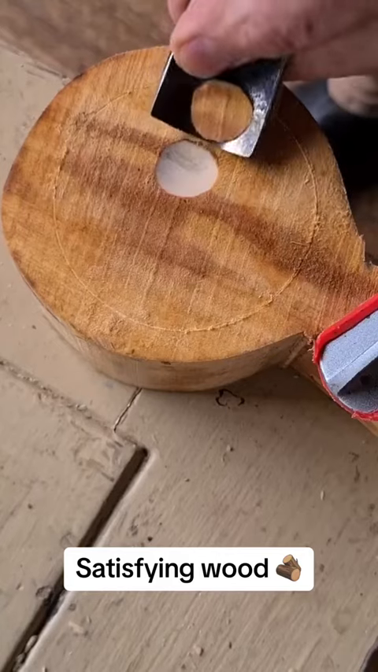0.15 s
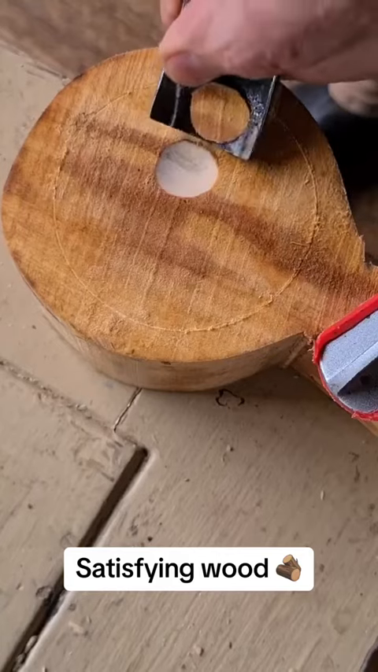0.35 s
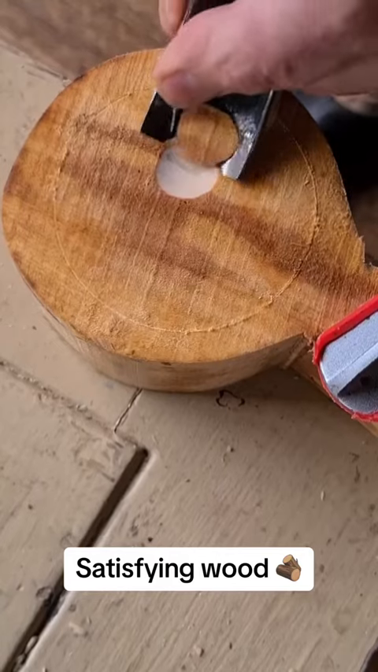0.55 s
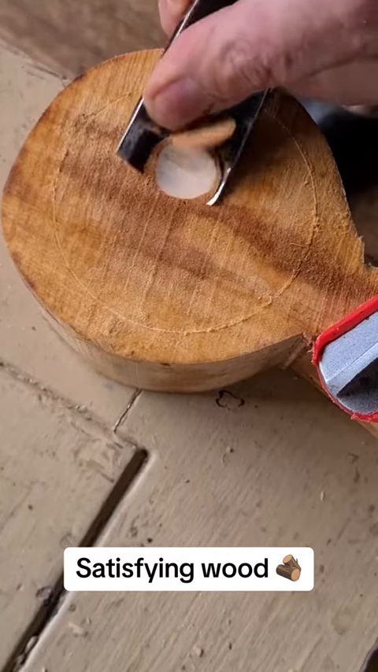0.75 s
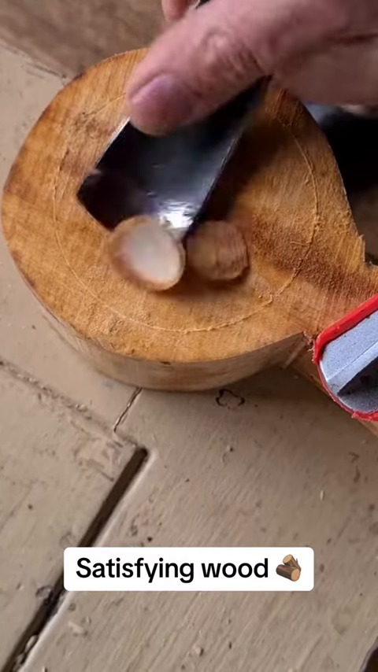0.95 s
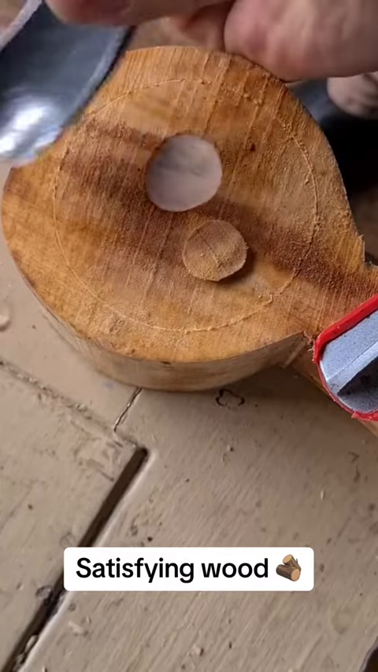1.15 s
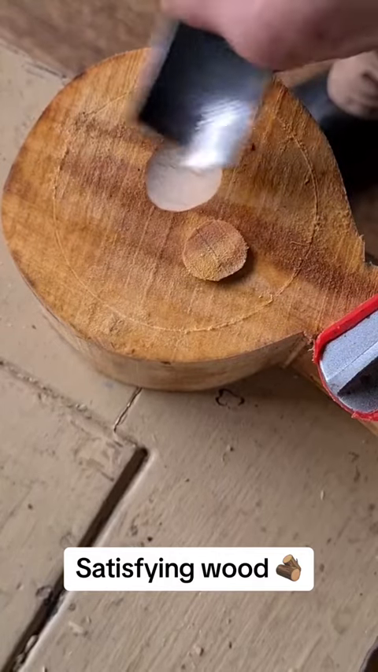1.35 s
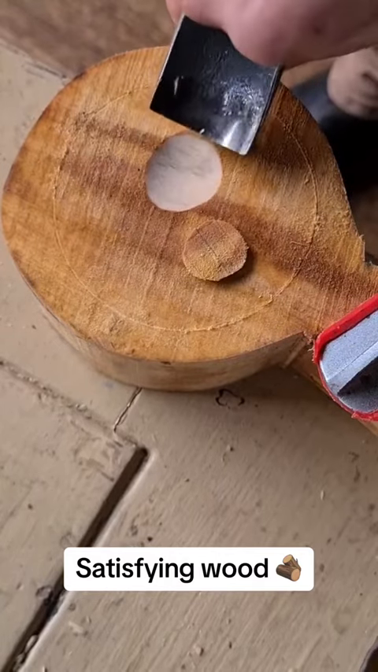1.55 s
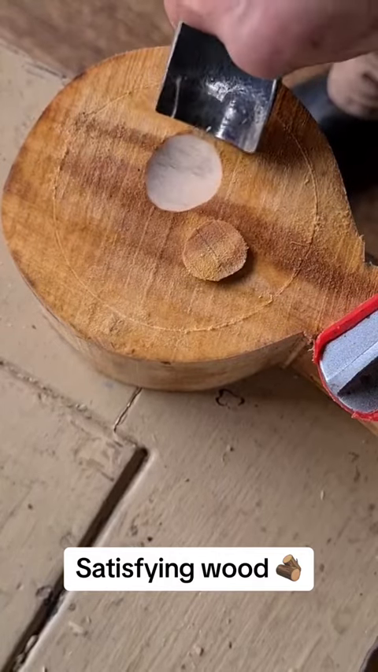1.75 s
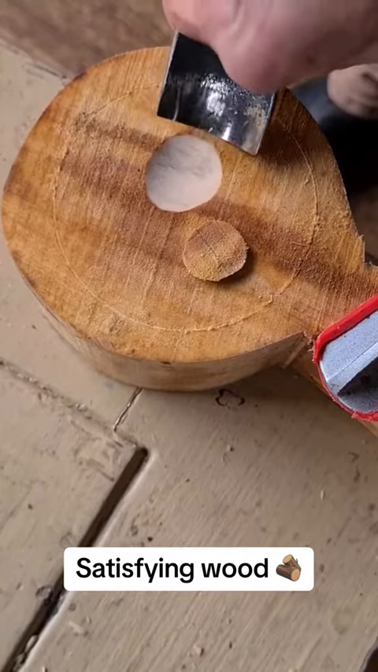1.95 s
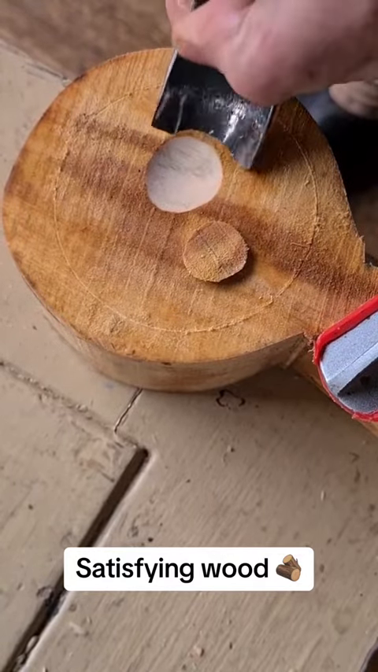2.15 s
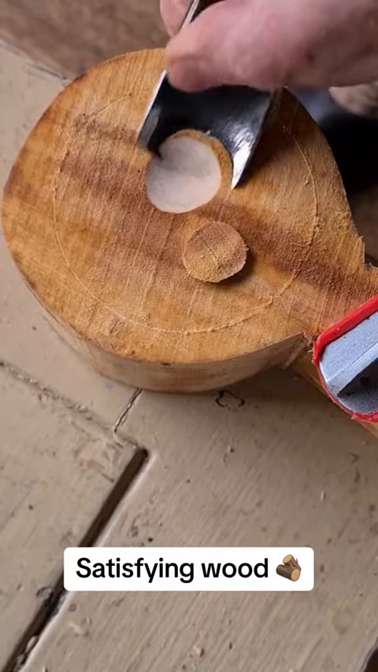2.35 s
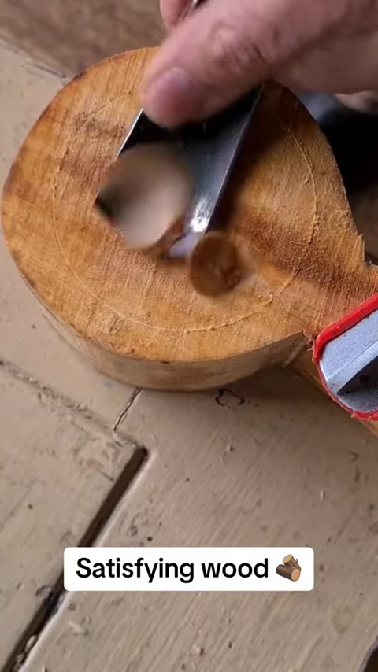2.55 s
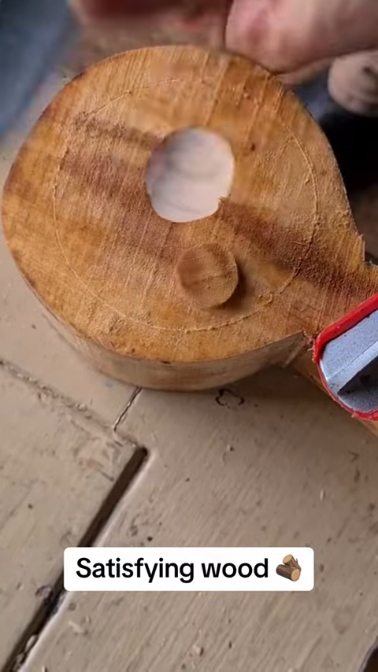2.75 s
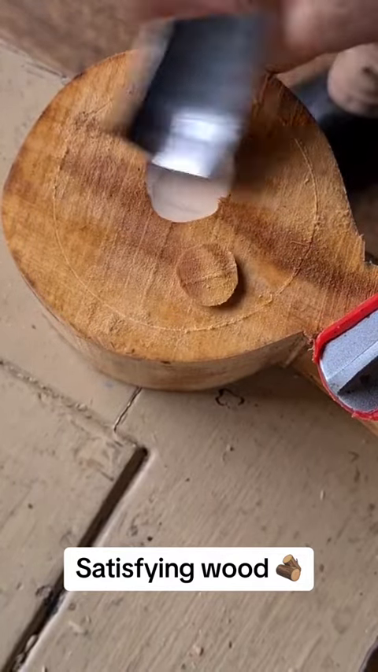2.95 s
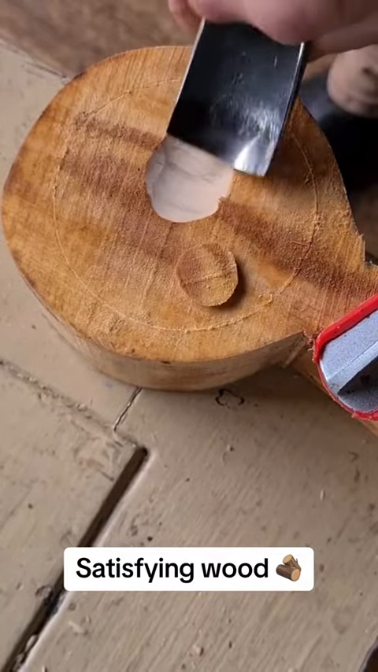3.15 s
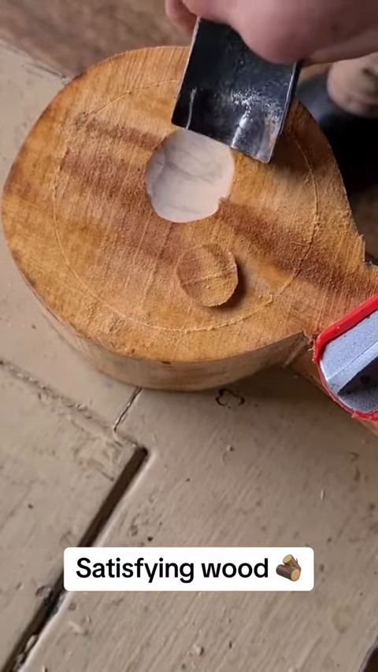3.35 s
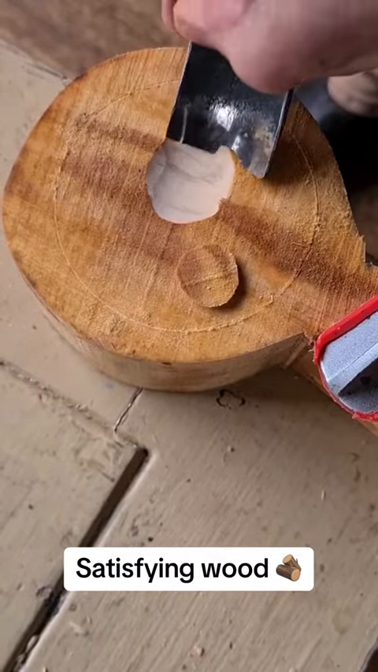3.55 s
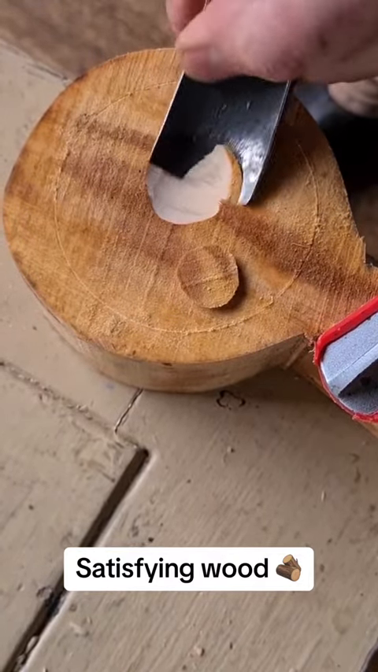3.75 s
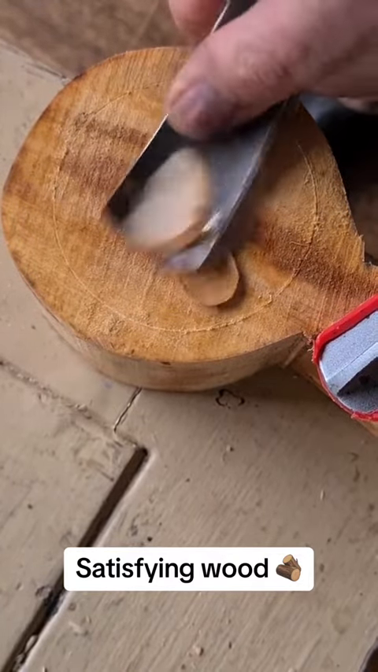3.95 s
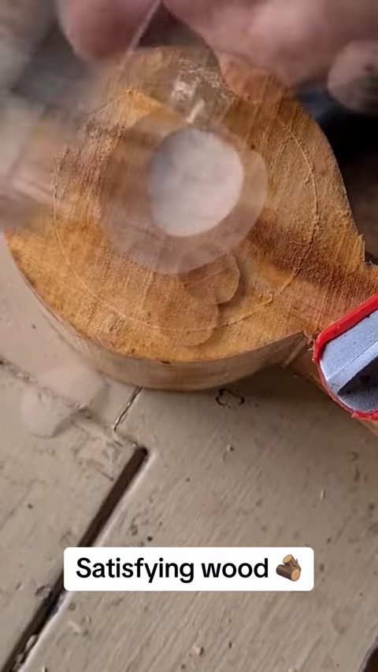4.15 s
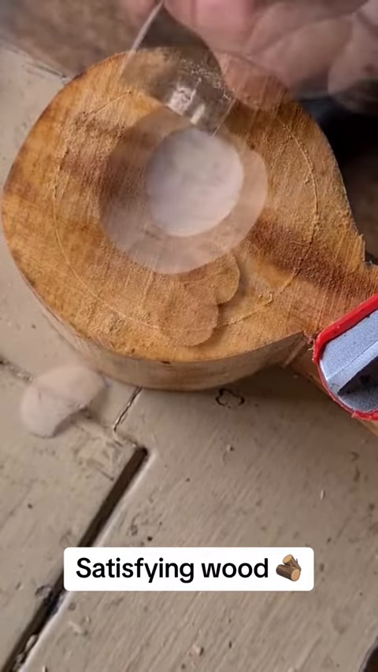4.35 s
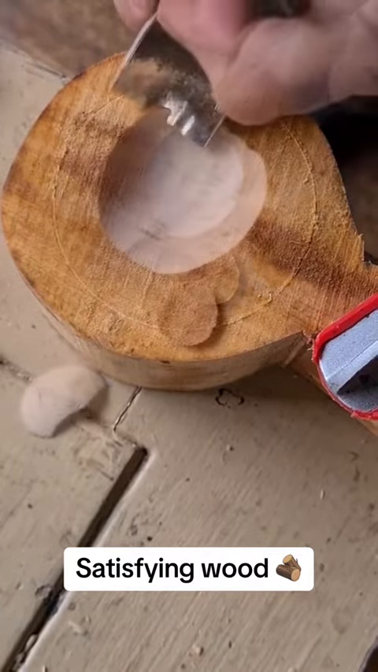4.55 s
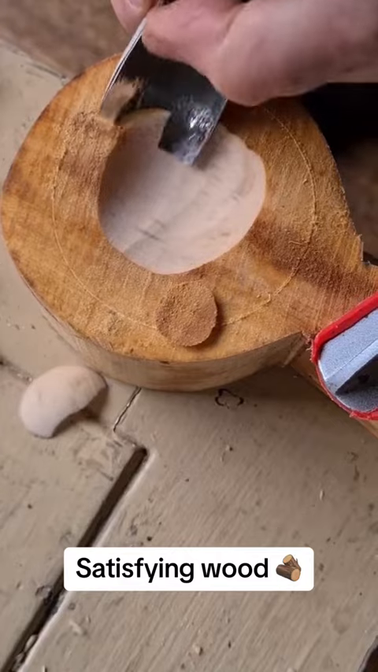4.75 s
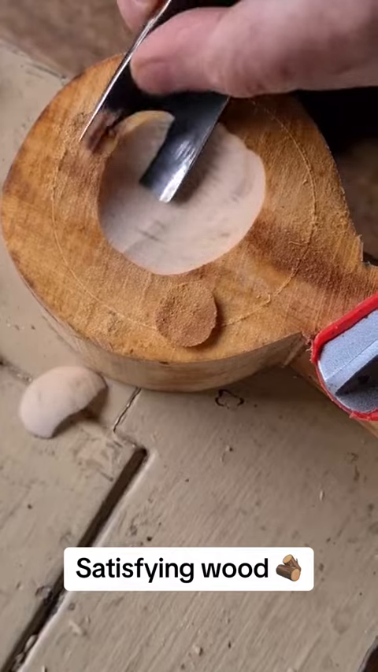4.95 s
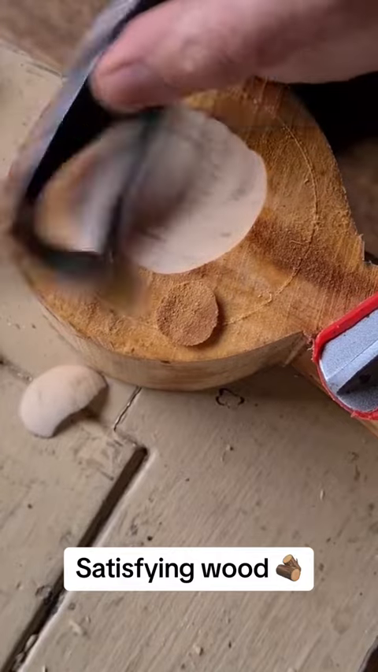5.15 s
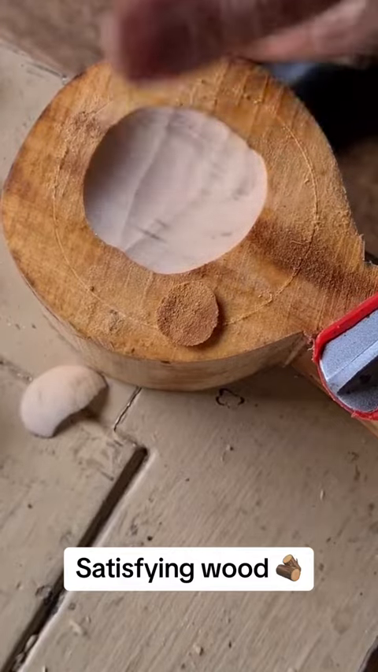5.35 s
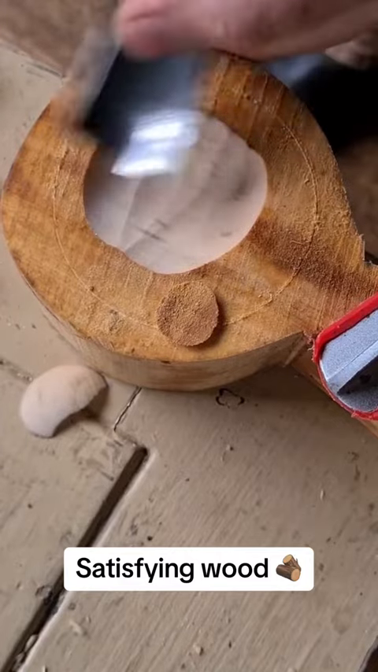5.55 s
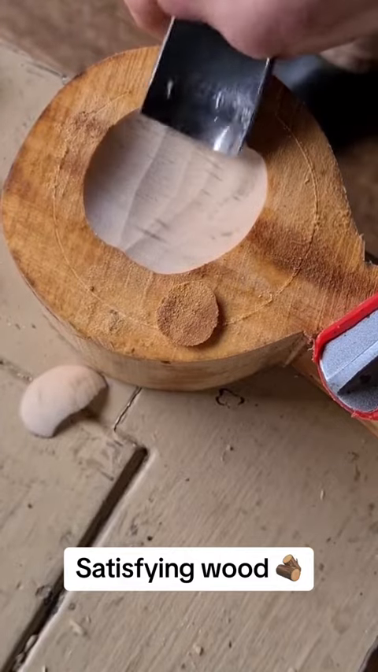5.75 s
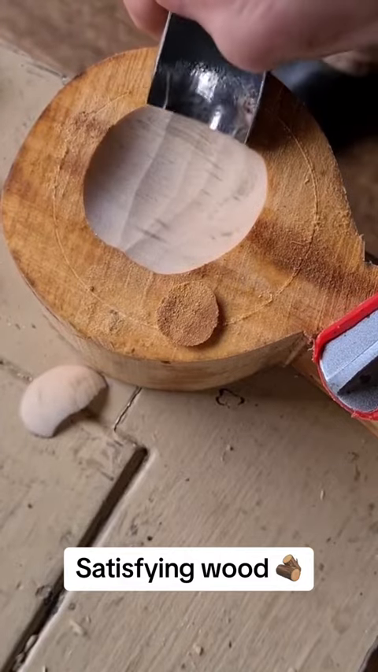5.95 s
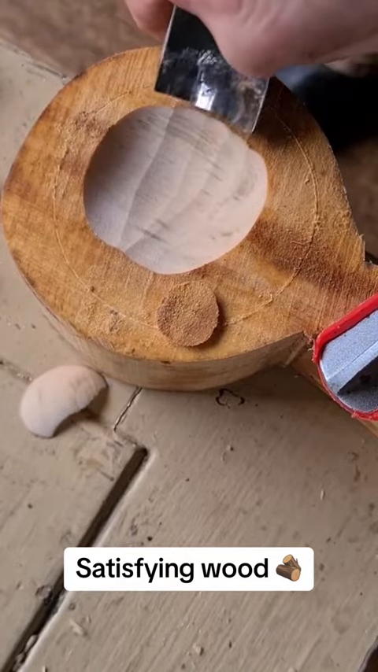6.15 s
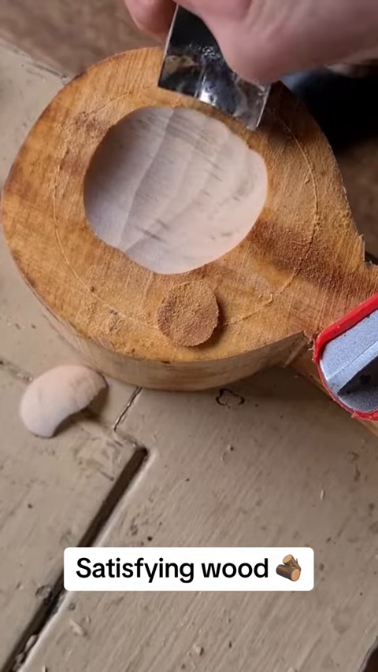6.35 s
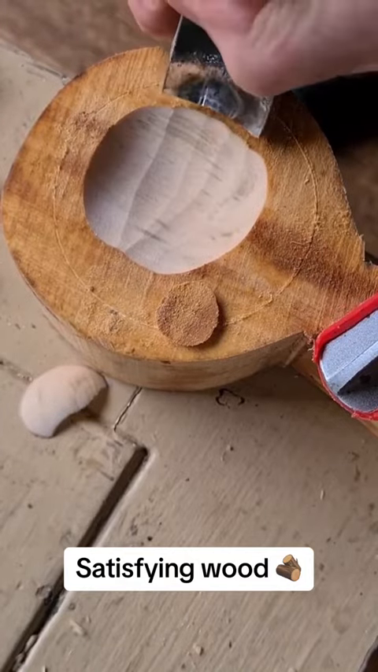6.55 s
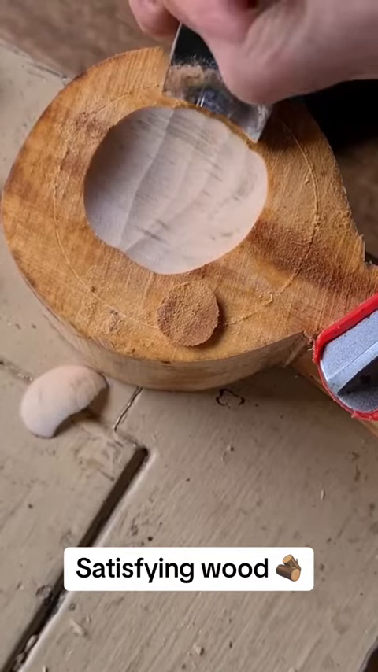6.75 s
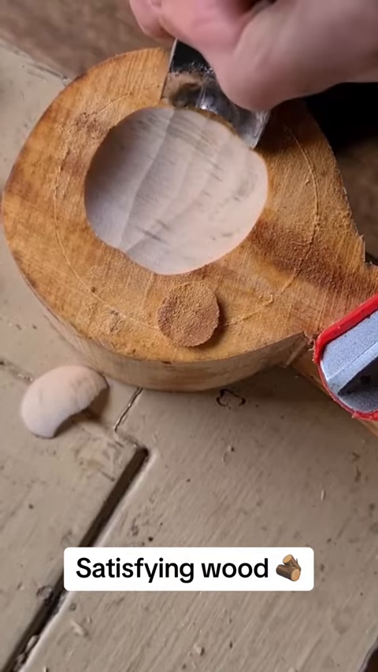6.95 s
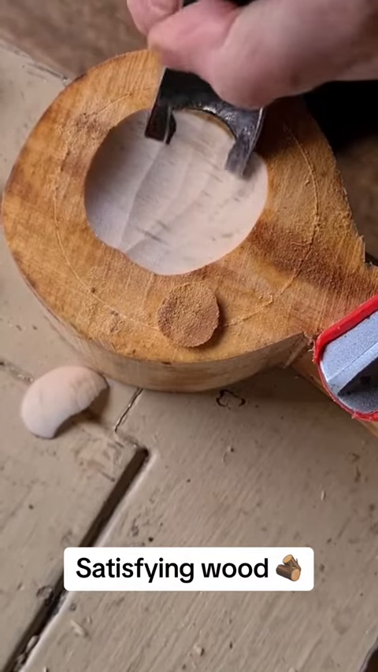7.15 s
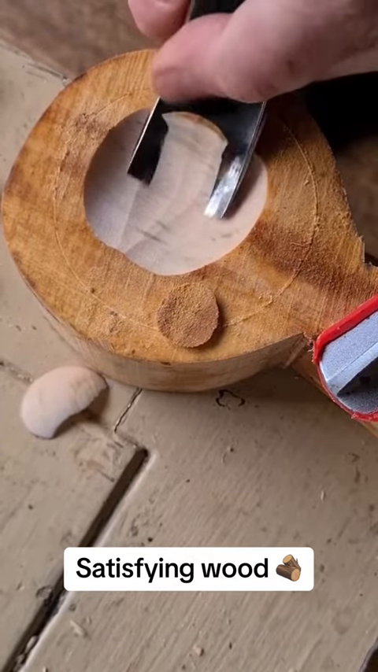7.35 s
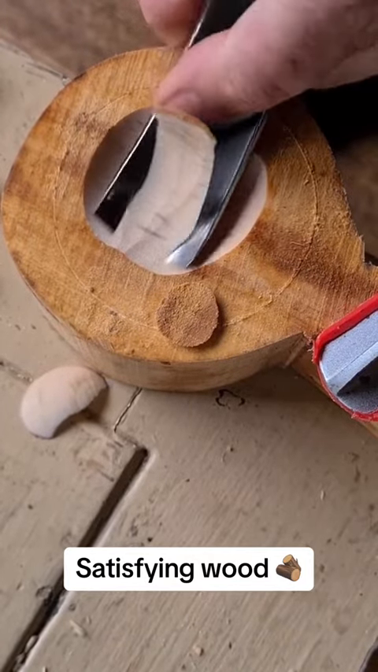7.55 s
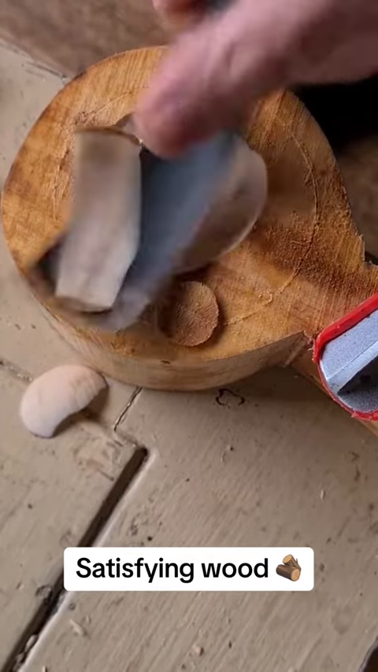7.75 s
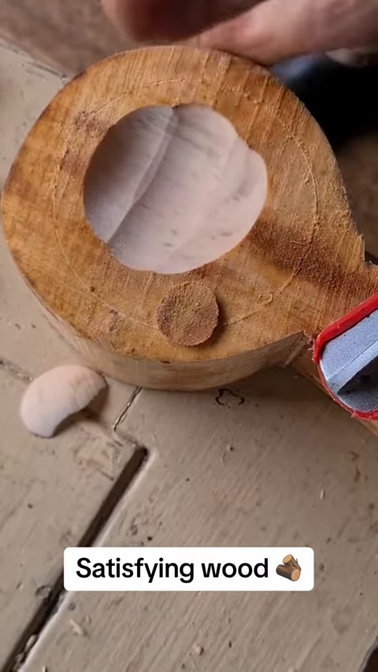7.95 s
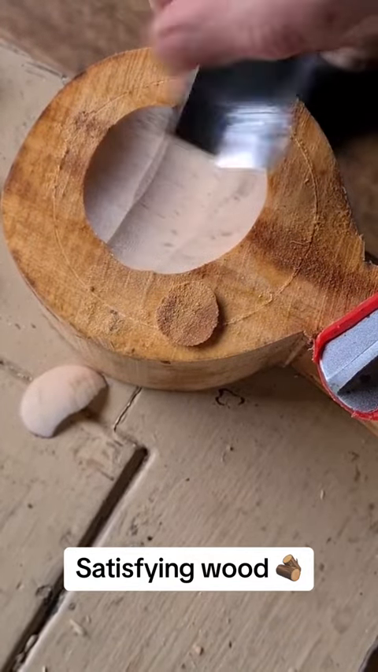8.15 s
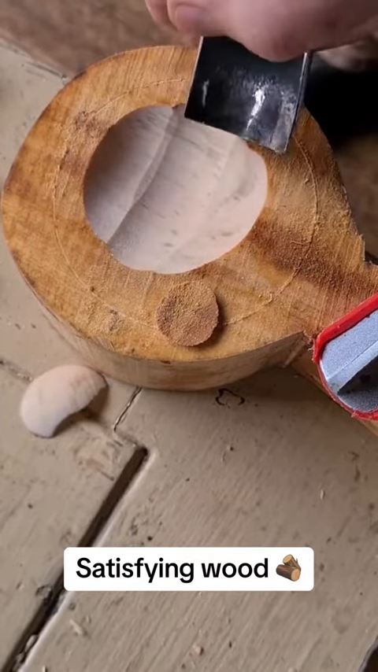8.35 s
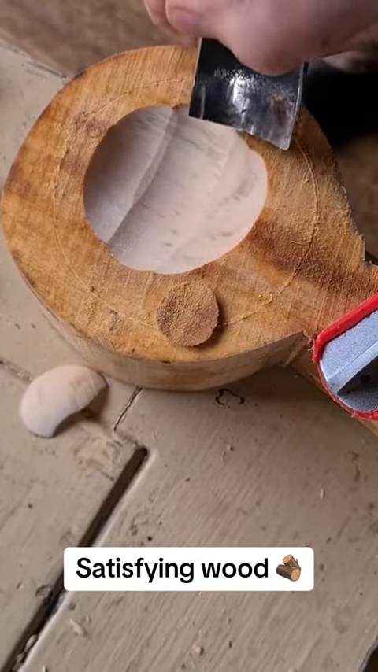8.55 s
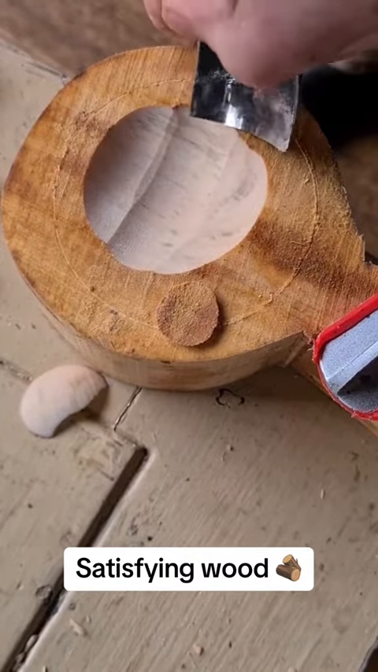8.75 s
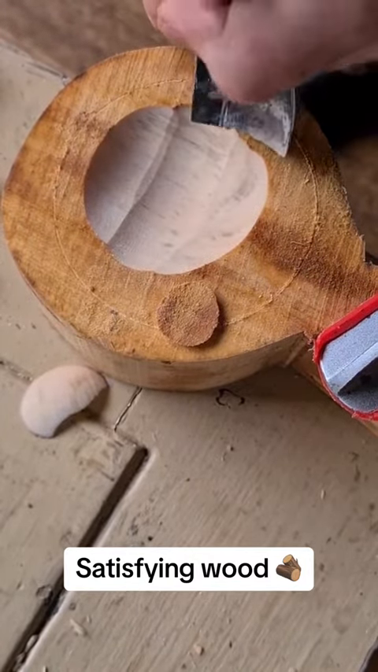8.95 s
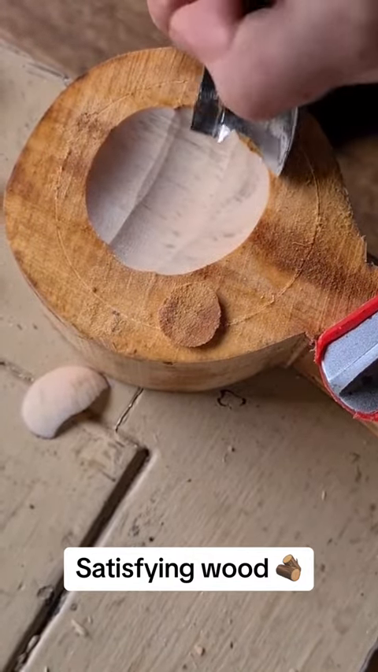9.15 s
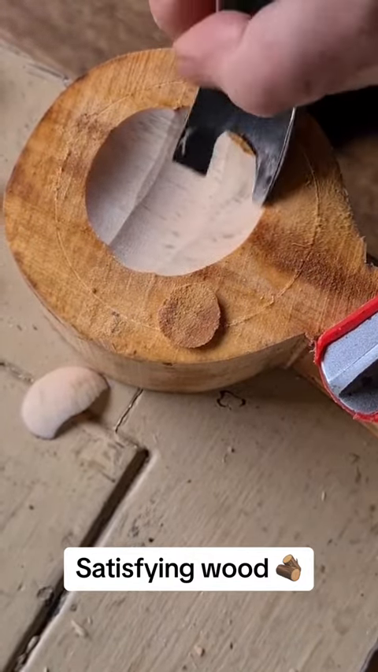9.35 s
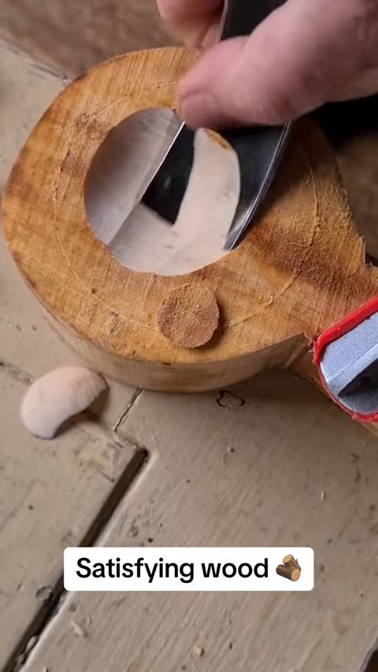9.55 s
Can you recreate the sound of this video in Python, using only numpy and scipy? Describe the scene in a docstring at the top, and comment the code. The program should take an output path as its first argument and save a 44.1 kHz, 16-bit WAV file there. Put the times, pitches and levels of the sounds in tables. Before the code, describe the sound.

A hand gouge scrapes and crunches through wood in separate strokes, with small steel ticks and dull wooden knocks, close by.

```python
"""A hand gouge cuts six strokes across the end grain of a small log slice lying on a wooden board.
Fibres fracture by the thousand under the edge and excite the resonances of the wood; as the shaving
lengthens, its friction on the steel rises to a hiss. Hand and shaving rub and creak, steel and chips
tick, the block knocks on the board, and once the blade springs free and rings.
The sound is heard from close by in a small room."""
import sys
import numpy as np
from scipy import signal
from scipy.fft import rfft, irfft, next_fast_len
from scipy.io import wavfile

SR = 44100
rng = np.random.default_rng(int(sys.argv[2]) if len(sys.argv) > 2 else 0)


def transcribe(signal):
    """Save signal, clipped to [-1, 1], as a 16-bit WAV file at the path in sys.argv[1]."""
    frames = np.atleast_2d(signal).T
    limited = np.clip(frames, -1, 1)
    pcm = np.round(limited * 32767).astype(np.int16)
    wavfile.write(sys.argv[1], SR, pcm)


N = 423801
TIME = np.arange(N) / SR
BINS = np.fft.rfftfreq(8192, 1 / SR)

# Spectrum of the room noise: f/Hz, relative level/dB
AIR_SPECTRUM = [(15, -30.5), (25, -8), (53, -8), (320, -8), (540, -15), (1410, -14), (2170, -18.5),
                (7000, -26.5), (9000, -40)]
# Swells of friction: centre t/s, duration/s, level/dB, resonance f/Hz, half-width/Hz
RUBS = [(0.108, 0.17, -62, 397, 110), (0.242, 0.47, -69, 1170, 2500), (0.717, 0.3, -46.5, 3630, 450),
        (0.719, 0.075, -38, 444, 100), (0.922, 0.17, -46.5, 10900, 3500), (2.345, 0.34, -59.5, 4230, 700),
        (4.028, 0.043, -32.5, 400, 140), (5.057, 0.49, -46.5, 3350, 260), (5.129, 0.23, -34.5, 1140, 170),
        (5.169, 0.17, -41, 6090, 259), (5.298, 0.032, -47, 750, 300), (6.18, 0.25, -63.5, 340, 200),
        (7.614, 0.33, -35, 5380, 650), (8.062, .11, -56.5, 340, 400), (8.678, 0.15, -57.5, 400, 70),
        (9.52, 0.14, -39, 1170, 130)]
# Peaks and dips of the hollow in the wood: f/Hz, half-width/Hz, height/dB
HOLLOW_PEAKS = [(1165, 130, 2.5), (1627, 30, -6.5), (1920, 84, 4)]
# Band cancelled by the echo off the blade, moving with its angle: t/s, f/Hz, depth (0-1)
BLADE_NOTCH = [(1, 2730, 0.5), (2.3, 2206, 0.4), (4.1, 2394, 1), (5.1, 3040, 1), (7.35, 2560, 0.9),
               (7.75, 2830, 1), (8.9, 2440, 0)]
# Impacts of block on board: t/s, level/dB, ring f/Hz, relative thud level/dB
KNOCKS = [(0.576, -35.5, 103, -9), (0.937, -28, 139, -6), (1.013, -34.5, 104, -18), (2.116, -39, 97, -0.5),
          (2.404, -35, 80, -22), (2.689, -33, 86.7, -7), (2.79, -45, 109.5, -22), (3.446, -42.5, 190, -31),
          (3.475, -43.5, 117, -33.5), (3.773, -23, 77.6, -5.5), (4.101, -34.5, 174, -26),
          (5.189, -21, 144, -19), (5.245, -31, 127, -21), (5.293, -34, 157, 12), (5.318, -26.5, 167, -14),
          (5.394, -38.5, 208.4, -2.5), (5.842, -41, 102.4, 7.5), (7.008, -34.5, 74, -4.5),
          (7.087, -28.5, 68.6, -5.5), (7.223, -24.5, 79.5, -33.5), (7.675, -19.5, 84, -12),
          (8.886, -45, 87.5, -10)]
# Spectrum of the thud: f/Hz, relative level/dB
THUD_SPECTRUM = [(40, -25.5), (100, -1), (320, 1), (540, -11.5), (800, -24.5), (2500, -42), (8000, -57)]
# Pushes, several to a stroke that stalls: start t/s, end t/s, bite time/s, strength at bite/dB,
# strength at end/dB, final hiss/dB re strength, initial rasp/dB re strength, shudder level/dB
PUSHES = [(0.577, 0.967, 0.0047, -46, -34, -4.5, -4, -45.5), (2.117, 2.675, 0.012, -55, -37, -4, -5.5, -46),
          (3.611, 3.736, 0.027, -46, -46.5, -18, -2.5, -50), (3.774, 4.068, 0.007, -40, -34.5, -2, -4, -45),
          (4.593, 5.216, 0.055, -48.5, -33, -5.5, -6.5, -43),
          (6.828, 7.134, 0.011, -57.5, -60.5, -10.5, -8.5, -55.5),
          (7.118, 7.156, 0.012, -35.5, -28, -4, -4, -42),
          (7.153, 7.717, 0.01, -46.5, -28, 1.5, -6.5, -38.5),
          (9.029, 9.234, 0.05, -67, -47, -23.5, -5.5, -56.5), (9.236, 9.598, 0.02, -38, -35, -3.5, -4, -42)]
# Lurches where the wood gives way: centre t/s, duration/s, added strength/dB
LURCHES = [(0.935, 0.19, 1), (2.525, 0.26, 6.5), (4.036, 0.1, 4), (4.791, 0.13, 6), (4.949, 0.12, 7),
           (5.137, 0.25, 6.5), (7.364, 0.12, 8.5)]
# Modes of block and board: f/Hz, height/dB
BOARD_MODES = [(82, 9), (280, 10), (322, 9.5), (390, 11), (462, 11), (536, 8.5), (714, 10), (1100, 5.5),
               (1228, 5)]
# Spectra of the cut: f/Hz, relative level/dB
FIBRE_SPECTRUM = [(100, -20), (170, 1), (420, -6.5), (620, -3.5), (1200, -7.5), (1600, -3.5), (1950, -6.5),
                  (2600, -5), (6300, -27.5), (9000, -59)]  # snapping fibres
RASP_SPECTRUM = [(1500, -24), (2700, 2.5), (3750, 0.5), (5200, -6), (6300, -5.5), (8300, -26),
                 (14000, -48.5)]  # edge in the grain
HISS_SPECTRUM = [(2500, -22.5), (4300, -17), (4900, 1.5), (6200, -0.5), (7200, -3), (8300, -15),
                 (11700, -15.5), (13000, -19.5), (15800, -46.5)]  # shaving on steel
SHUDDER_SPECTRUM = [(30, -21.5), (52, 3), (80, 1), (110, -0.5), (160, 2), (230, -12.5), (500, -80)]  # shaken board
# Ticks of steel, chips and last fibres: t/s, relative crack level/dB, contact hardness/dB
TICKS = [(0.58, -43.5, 2), (0.958, -56, -9), (1.072, -43.5, 14), (1.351, -36.5, 4.5), (1.436, -39, 12),
         (2.119, -45, 3), (2.6323, -27, 24), (2.6385, -17, 31), (3.06, -24.5, 9.5), (3.1946, -48, -10.5),
         (3.779, -35, 4), (5.142, -42, -18.5), (5.188, -38, -12), (5.449, -36, 6.5), (5.459, -33, 7),
         (5.576, -45.5, -2.5), (5.639, -46.5, 6.5), (5.844, -61.5, -16.5), (6.838, -54.5, -5.5),
         (7.006, -47, -7), (7.088, -49, -11), (7.669, -27.5, 0.5), (7.873, -47.5, 6.5), (7.936, -48.5, 0),
         (8.234, -31.5, -2), (8.246, -39, -8)]
# Body, crack and edge bands of a tick: lower f/Hz, upper f/Hz
TICK_BANDS = [(420, 2300), (3700, 7100), (8200, 12800)]
# Release of the blade: t/s, level/dB
BLADE_RELEASES = [(4.058, -37.5)]
# Modes of the blade: f/Hz, relative level/dB, T60/s
BLADE_MODES = [(7100, 0, 0.036), (12100, -4.5, 0.1)]
# Lateral reflections: f/Hz, level/dB re the direct sound
SIDE_GAIN = [(80, -18.5), (400, -22), (2500, -7.5)]
# Reverberation time: f/Hz, T60/s
ROOM_T60 = [(100, 0.38), (1400, 0.3), (10000, 0.24)]
# Likeness of the reverberation at left and right: f/Hz, correlation (0-1)
ROOM_CORRELATION = [(150, 0.97), (700, 0.31), (2500, 0)]
# Channel balance: f/Hz, left minus right level/dB
BALANCE = [(120, -0.3), (600, -3), (2000, 0), (4500, -3.5), (8000, -1)]


def amp(db):
    """Amplitude ratio of a level in decibels."""
    return 10 ** (np.asarray(db) / 20)


def unit(x):
    """Normalisation to rms 1."""
    return x / np.sqrt(np.mean(x ** 2) + 1e-20)


def read(points, hz):
    """Interpolation of a table on a logarithmic frequency axis."""
    f, value = np.transpose(points)
    return np.interp(np.log(hz + 1), np.log(f + 1), value)


def add(mix, s, sound):
    """Superposition of a sound on the mix from time s."""
    part = mix[max(round(s * SR), 0):][:len(sound)]
    part += sound[:len(part)]


def peak(hz, half_width_hz, height_db):
    """Lorentzian resonance peak, in dB on BINS."""
    return height_db / (1 + ((BINS - hz) / half_width_hz) ** 2)


def colour(x, db):
    """Minimum-phase filtering at unit energy, with the spectral shape db on BINS."""
    log_gain = np.log(amp(np.maximum(db, db.max() - 100)))
    phase = -signal.hilbert(np.r_[log_gain, log_gain[-2:0:-1]]).imag[:len(db)]
    taps = irfft(np.exp(log_gain + 1j * phase))[:len(db)]
    return signal.oaconvolve(x, taps / np.linalg.norm(taps))[:len(x)]


def equalise(x, points, share=1):
    """Zero-phase filtering by a share of a table of f/Hz, level/dB."""
    size = next_fast_len(N + SR)
    hz = np.fft.rfftfreq(size, 1 / SR)
    return irfft(rfft(x, size) * amp(share * read(points, hz)), size)[..., :N]


def wander(rate_hz):
    """Low-pass Gaussian noise: a random drift of rms 1."""
    hz = np.fft.rfftfreq(N, 1 / SR)
    return unit(irfft(rfft(rng.standard_normal(N)) * np.exp(-(hz / rate_hz) ** 2), N))


def snaps(per_s, spread_db):
    """Poisson process: clicks of random size, with the same power at any rate."""
    size = amp(spread_db * np.minimum(rng.exponential(1, N), 4))
    polarity = rng.choice([-1, 1], N)
    occurs = rng.random(N) < per_s / SR
    return unit(size * polarity * occurs / np.sqrt(per_s))


def air(mid_db=-69, side_db=-8):
    """Stationary background noise of the room, partly correlated between left and right."""
    mid, side = (colour(rng.standard_normal(N), read(AIR_SPECTRUM, BINS)) for _ in range(2))
    return amp(mid_db) * (mid + amp(side_db) * np.array([side, -side]))


def rubs():
    """Friction of hand, steel and shaving drives resonances: narrow ones creak, wide ones hiss."""
    out, grain = np.zeros(N), snaps(per_s=7800, spread_db=5.0)
    for s, length, db, hz, width_hz in RUBS:
        swell = np.hanning(int(length * SR))
        resonance_db = -20 * np.log10(1 + ((BINS - hz) / width_hz) ** 2)
        start = max(s - length / 2, 0)
        friction = np.roll(grain, -int(start * SR))[:len(swell)]
        add(out, start, amp(db) * swell * colour(friction, resonance_db))
    return out


def drifting_notches(x, depth_db=6, width_hz=120, length_s=.06):
    """Time-varying filtering: notches drift as the edge travels and the chip grows."""
    hz, t, spectra = signal.stft(x, SR, nperseg=512)
    field = rng.standard_normal(spectra.shape)
    for axis, span in enumerate([width_hz / hz[1], length_s / t[1]]):
        bell = np.exp(-(np.arange(-40, 41) / span) ** 2)
        field = signal.fftconvolve(field, np.expand_dims(bell, 1 - axis), "same")
    notches = np.logaddexp(0, 2 * unit(field))
    reach = hz ** 2 / (hz ** 2 + 900 ** 2)  # the low modes belong to the board and stay put
    gain = amp(-depth_db * notches * reach[:, None])
    gain /= np.sqrt(np.mean(gain ** 2, axis=1, keepdims=True))
    return signal.istft(spectra * gain, SR, nperseg=512)[1][:N]


def hollow(x):
    """Cavity resonance: the hollow in the wood imposes fixed peaks and dips."""
    return colour(x, sum(peak(hz, width, db) for hz, width, db in HOLLOW_PEAKS))


def blade_echo(x, width_hz=230):
    """Destructive interference: the echo off the blade cancels one moving band."""
    s, hz, depth = np.transpose(BLADE_NOTCH)
    carrier = np.exp(2j * np.pi * np.cumsum(np.interp(TIME, s, hz)) / SR)
    pole = np.exp(-np.pi * width_hz / SR)
    baseband = signal.lfilter([(1 - pole) / 2] * 2, [1, -pole], x / carrier + 1e-18)
    band = 2 * (carrier * baseband).real
    return x - np.clip(np.interp(TIME, s, depth), 0, 1) * band


def knocks(ring_t60=0.19, thud_t60=0.29, rise_s=0.003):
    """Impact excitation: the block strikes with a dull thud and the board swings in damped vibration."""
    t, out = np.arange(SR // 2) / SR, np.zeros(N)
    ring_envelope = np.exp(-np.log(1000) * t / ring_t60) * (1 - np.exp(-t / rise_s))
    thud_envelope = np.exp(-np.log(1000) * t / thud_t60)
    for s, db, hz, thud_db in KNOCKS:
        ring = -np.sin(2 * np.pi * hz * t) * ring_envelope
        thud = colour(rng.standard_normal(len(t)) * thud_envelope, read(THUD_SPECTRUM, BINS))
        add(out, s, amp(db) * (ring + amp(thud_db - 7.0) * thud))
    return out


def pushes(hiss_growth_db=15, rasp_fade_db=0.5, release_s=0.0063, settle_s=0.0577):
    """Amplitude envelopes of crunch, hiss, rasp and shudder: each push bites, runs on and decays."""
    gains = np.zeros((4, N))
    uneven_db = 1.35 * wander(rate_hz=27.6)  # hard and soft growth rings
    for s, length, db in LURCHES:
        add(uneven_db, s - length / 2, db * np.hanning(int(length * SR)))
    for start, end, bite_s, bite_db, end_db, hiss_db, rasp_db, shudder_db in PUSHES:
        depth = np.clip((TIME - start) / (end - start), 0, 1)
        bite = np.clip((TIME - start) / bite_s, 0, 1)
        after = np.maximum(TIME - end, 0)
        strength_db = bite_db + (end_db - bite_db) * depth + uneven_db
        strength = bite * np.exp(-after / release_s) * amp(strength_db)
        hiss = strength * amp(hiss_db - hiss_growth_db * (1 - depth))  # grows as the shaving lengthens
        rasp = strength * amp(rasp_db - rasp_fade_db * depth)
        shudder = bite * np.exp(-after / settle_s) * amp(shudder_db)
        gains += [strength, hiss, rasp, shudder]
    return gains


def board():
    """Modal response of block and board, in dB on BINS."""
    return sum(peak(hz, 11 + 0.013 * hz, db) for hz, db in BOARD_MODES)


def cutting(snaps_per_s=30000, crowding=.65, splinter_db=-6):
    """Fracture rings the wood, sliding friction rasps and hisses, and the uneven push shakes the board."""
    strength, hiss_gain, rasp_gain, shudder_gain = pushes()
    board_db = board()
    # Sparse snaps under a slow edge creak; dense ones under a fast edge crunch.
    fibres = snaps(snaps_per_s * strength ** crowding + 20, spread_db=-0.5)
    splinters = snaps(per_s=130, spread_db=1.0)  # whole bundles tear
    fracture = unit(fibres + amp(splinter_db) * splinters)
    crunch = colour(fracture, read(FIBRE_SPECTRUM, BINS) + board_db)
    sliding = unit(fracture + .5 * rng.standard_normal(N))
    rasp = colour(sliding, read(RASP_SPECTRUM, BINS))
    hiss = colour(sliding, read(HISS_SPECTRUM, BINS))
    shudder = colour(snaps(per_s=1400, spread_db=2.5), read(SHUDDER_SPECTRUM, BINS) + board_db)
    return rasp_gain * rasp + hiss_gain * hiss + strength * crunch + shudder_gain * shudder


def contact(count=8):
    """Selective excitation: each contact point favours its own modes of wood and steel (dB on BINS)."""
    modes_hz = np.geomspace(550, 7500, count) * rng.uniform(.8, 1.2, count)
    return sum(peak(hz, 80 + .03 * hz, 5) for hz in modes_hz)


def ticks(scuff_s=.0022, crack_s=0.0022, ring_s=0.016, ring_db=-23, impulse=7):
    """Contact transients of scuff, crack and ring: a harder contact shifts energy to high frequencies."""
    t, out = np.arange(-512, 4096) / SR, np.zeros(N)
    limits_hz = np.ravel(TICK_BANDS)
    width_db = 10 * np.log10(limits_hz[1::2] - limits_hz[::2])
    rolloff_db = -10 * np.log10(1 + (limits_hz[0] / (BINS + 1)) ** 4 + (BINS / limits_hz[-1]) ** 10)
    scuff = amp(-5.0) * np.exp(-abs(t) / scuff_s)  # the edge brushes the wood first
    decay = np.exp(-abs(t) / crack_s) + amp(ring_db) * np.exp(-abs(t) / ring_s)
    envelope = np.where(t < 0, scuff, decay)
    for s, crack_db, hardness_db in TICKS:
        edge_db = min(-25 + 2.2 * hardness_db, -4.5)
        bands_db = crack_db + np.array([-hardness_db, 0, edge_db])
        spectrum_db = np.interp(BINS, limits_hz, np.repeat(bands_db - width_db, 2)) + rolloff_db
        excitation = rng.standard_normal(len(t)) * envelope - impulse * (t == 0)
        burst = colour(excitation, spectrum_db + contact() + .5 * board())
        gain = amp(18.5) * np.linalg.norm(amp(bands_db))
        add(out, s + t[0], gain * burst / np.linalg.norm(burst))
    return out


def blade_ring(build_s=0.031):
    """Friction-excited vibration: the modes of the sliding blade build up, then decay once it is free."""
    out = np.zeros(N)
    for s, release_db in BLADE_RELEASES:
        t = TIME - s
        for hz, db, t60 in BLADE_MODES:
            envelope = np.exp(np.minimum(t / build_s, -np.log(1000) * t / t60))
            out += amp(release_db + db) * envelope * np.sin(2 * np.pi * hz * t)
    return out


def gouge():
    """Source and filter: scrapes and ticks are shaped by the hollow and the echo off the blade."""
    scrape = drifting_notches(cutting() + rubs())
    return blade_echo(hollow(scrape + ticks()))


def side_reflections(delay_s=0.0052):
    """Scattering off hand and board: the gouge arrives later from the sides, its grain scrambled."""
    scattered = equalise(gouge(), SIDE_GAIN)
    side = np.pad(scattered, (int(delay_s * SR), 0))[:N]
    return np.array([-side, side])


def room(x, delay_s):
    """Diffuse reverberation: each band decays at its own rate, and the bass reaches both sides alike."""
    hz, t, (left, other) = signal.stft(rng.standard_normal((2, SR // 2)), SR, nperseg=256)
    correlation = np.clip(read(ROOM_CORRELATION, hz), -1, 1)[:, None]
    right = correlation * left + np.sqrt(1 - correlation ** 2) * other
    spectra = np.array([left, right]) * np.exp(-np.log(1000) * t / read(ROOM_T60, hz)[:, None])
    spectra *= (hz / (hz + 220))[:, None]  # close up, the bass is mostly direct
    tail = np.pad(signal.istft(spectra, SR, nperseg=256)[1], ((0, 0), (int(delay_s * SR), 0)))
    tail /= np.linalg.norm(tail, axis=1, keepdims=True)
    return signal.fftconvolve(x[None], tail, axes=1)[:, :N]


def scene():
    """Superposition of direct sound, early reflections, reverberation and background noise."""
    direct = gouge() + blade_ring() + knocks()
    return direct + side_reflections() + room(amp(-4.5) * direct, delay_s=.009) + air()


def record(dry):
    """Band-limited stereo pickup, slightly stronger on the right."""
    low_hz, high_hz = 30, 15800
    balanced = equalise(dry, BALANCE, share=np.array([[.5], [-.5]]))
    highpass = signal.butter(2, low_hz, "highpass", fs=SR, output="sos")
    lowpass = signal.firwin(511, high_hz, window=("kaiser", 9), fs=SR)
    return signal.oaconvolve(signal.sosfilt(highpass, balanced), lowpass[None], "same")


dry = scene()
out = record(dry)
transcribe(out)
```